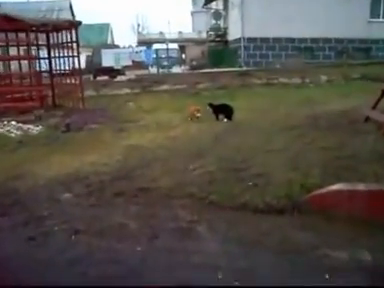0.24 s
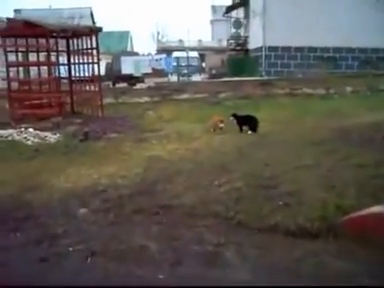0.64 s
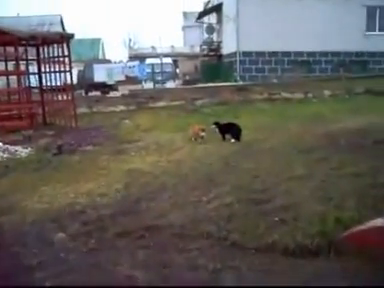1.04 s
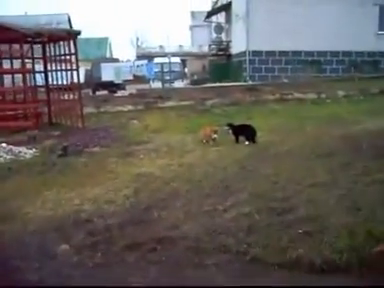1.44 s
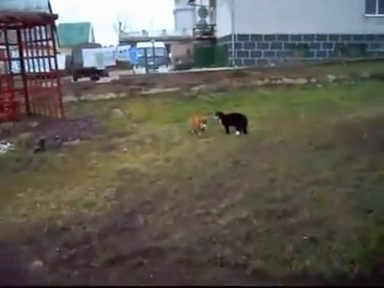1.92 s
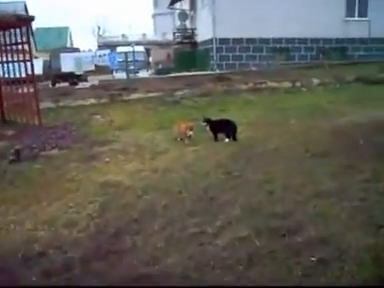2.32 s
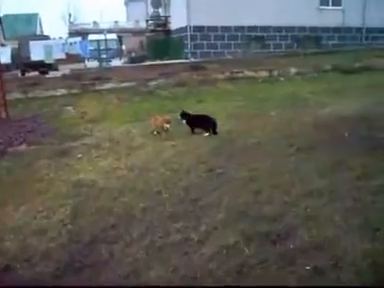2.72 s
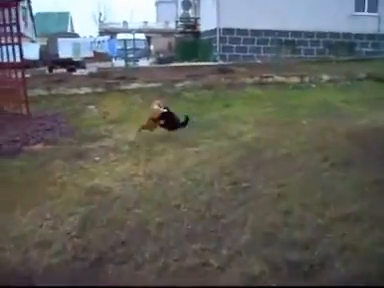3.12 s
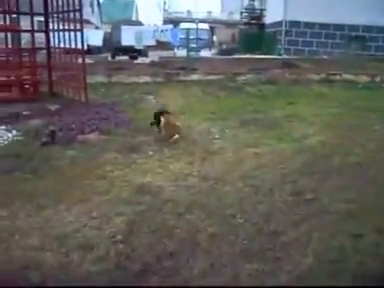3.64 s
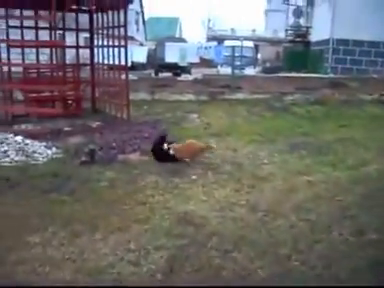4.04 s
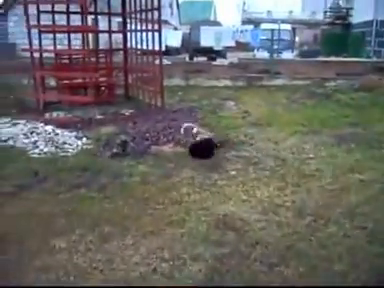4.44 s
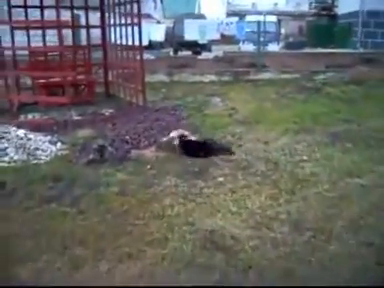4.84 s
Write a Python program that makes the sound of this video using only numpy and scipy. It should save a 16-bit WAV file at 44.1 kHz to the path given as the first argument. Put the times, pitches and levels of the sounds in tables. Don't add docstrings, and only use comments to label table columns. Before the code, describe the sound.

A cat's long nasal yowl strains upward and sinks to a soft moan, then a harsh screech explodes into rasps, growls and muffled whining outdoors.

```python
import sys
import numpy as np
from scipy import signal
from scipy.io import wavfile
from scipy.ndimage import uniform_filter1d

SR = 44100
rng = np.random.default_rng(int(sys.argv[2]) if len(sys.argv) > 2 else 0)


def to_wav(sig):
    pcm = np.clip(np.atleast_2d(sig), -1, 1) * 32767
    pcm = np.round(pcm).astype(np.int16)
    wavfile.write(sys.argv[1], SR, pcm.T)


def to_linear_factor(level_db):
    exponent = np.asarray(level_db, float) / 20
    return 10 ** exponent


N = 224086

# frequency in Hz, density in dB per Hz.
YARD_SPECTRUM = [(30, -9.5), (270, -12.5), (600, -5.5), (1070, -15), (1780, -9.5), (2300, -19), (2830, -20),
                 (7900, -22)]
# peak time in seconds, level in dB, decay to either side in seconds.
RUMBLE_SWELLS = [(0.0, -57.5, 0.48), (2.923, -42.5, .13), (4.075, -53.5, 0.47), (5.08, -55, .15)]
# time in seconds, pitch in Hz, effort in dB, nose opening 0-1.
YOWL_SWELLS = [
    [(0.0, 467, -48.5, 0.27), (0.14, 469, -45.5, 0.57), (0.205, 475, -49, 0.64), (0.222, 475, -35.5, 0.2),
     (0.385, 494.8, -29.5, 0.82), (0.43, 508, -27, 0.52), (0.62, 481, -32, 0.8), (0.69, 487.7, -42, 0.84),
     (0.87, 460.6, -47.5, 0.43)],
    [(0.93, 462.3, -35, 0.93), (1.02, 485.6, -32.5, 0.71), (1.07, 530.5, -29, 1), (1.11, 628, -22, 0),
     (1.16, 690.3, -22, .05), (1.24, 724.5, -19, .05), (1.33, 689.7, -22, .05), (1.41, 603, -20, 0.3),
     (1.47, 542.7, -22.5, 0.56)],
    [(1.53, 497.7, -31, 0.83), (1.61, 511, -29, 0.71), (1.7, 505.3, -29, 0.76), (1.88, 487.7, -28, 0.79),
     (1.95, 492.8, -27, .7), (2.03, 444, -31.5, .65), (2.08, 414.1, -43.5, 0), (2.105, 385, -57, .05)],
]
# centre in Hz, width in Hz, level in dB.
YOWL_CHEST = [(500, 2430, -7.5), (930, 200, 11)]
# centre in Hz, width in Hz, level in dB.
SKULL = [(6800, 900, -9), (8500, 1500, -20)]
# start in seconds, peak in dB, ring in Hz.
TICKS = [(0.1466, -31.5, 5560), (0.2044, -19, 4000), (0.2904, -31, 5300), (0.5396, -23, 5430),
         (1.558, -28, 5510), (3.7978, -29, 3158), (3.881, -39, 3990), (3.9874, -49, 3370),
         (4.0345, -34.5, 6600), (4.116, -33.5, 3207), (4.169, -33.5, 5000), (4.281, -38, 3750),
         (4.361, -38, 4450), (4.4512, -28.5, 4500), (4.464, -33, 3850), (4.4727, -32, 3760),
         (4.485, -30.5, 6260), (4.566, -34, 4270), (4.768, -32, 3380), (4.8348, -35.5, 4470),
         (4.9163, -25, 4590), (4.919, -15, 4700), (4.9251, -11.5, 4730)]
# start in seconds, peak in dB, ring in Hz.
BUMPS = [(1.119, -38, 600), (1.891, -25, 209), (3.987, -28.5, 478), (4.048, -34.5, 213)]
# time in seconds, pitch in Hz, effort in dB, lips parted 0-1.
MOAN = [(2.0, 214.6, -42, .1), (2.046, 244.4, -51.5, 1), (2.132, 321, -48.5, 0.65), (2.218, 419, -41, 0.17),
        (2.346, 476.4, -41.5, .15), (2.436, 401.4, -50, .8), (2.668, 450, -55, 0.98), (2.7, 408, -46, .95)]
# time in seconds, pitch in Hz, effort in dB, gape 0-1.
SCREECH = [(2.485, 204.5, -46.5, 1.03), (2.55, 284.2, -27, .6), (2.602, 321, -22.5, 0.01),
           (2.678, 364.2, -19, 0.17), (2.754, 463.2, -13, 0.23), (2.826, 504, -11.5, 0.62),
           (2.904, 543.7, -12, 0.17), (2.985, 646, -12, .05), (3.0, 628, -8.5, 0.1)]
# time in seconds, added roughness 0-1.
CRACKS = [(2.721, 0), (2.865, .2), (3.002, 0.1)]
# centre in Hz, width in Hz, level in dB.
CHEST = [(447.5, 335, 7), (884, 390, -2.5)]
# start in seconds, top in seconds, top in dB, final mouth and head resonances in Hz.
RASPS = [(2.968, 3.056, -8, 2250, 3584), (3.101, 3.229, -13.5, 1617, 5300), (3.291, 3.337, -26, 1330, 4600)]
# centre in Hz, width in Hz, level in dB.
RASP_CHEST = [(520, 550, -6), (940, 430, 4.5)]
# time in seconds, pitch in Hz, effort in dB.
SQUEAL = [(3.165, 833, -17.5), (3.19, 1066, -13), (3.21, 1335, -15.5), (3.24, 1178, -17.5),
          (3.275, 794, -37)]
# start in seconds, length in seconds, top in dB, mouth at the top in Hz, head in dB.
GROWLS = [(3.39, .235, -31, 2303, -55), (3.611, .165, -37.5, 1310, -75), (4.912, .15, -44, 1950, -48),
          (5.039, 0.098, -30.5, 1910, -44.5)]
# time in seconds, pitch in Hz, effort in dB.
WHINE = [(3.85, 424.5, -56), (3.904, 397, -51), (4.262, 384.7, -40), (4.452, 374.3, -51), (4.472, 398, -52),
         (4.654, 397.6, -55.5), (4.706, 380.5, -43.5), (4.918, 399, -50.5), (4.95, 383, -37)]
# start in seconds, level in dB, chest resonance in Hz, length in seconds.
GRUNTS = [(4.359, -39.5, 500, 0.045), (4.385, -43, 407, 0.047), (4.426, -42.5, 419, 0.031),
          (4.476, -41.5, 478, 0.018), (4.488, -37.5, 428, 0.035), (4.558, -38, 385, 0.043),
          (4.587, -40.5, 480, 0.037), (4.622, -46.5, 370.6, 0.052), (4.862, -37.5, 433, 0.045)]


def evened(x):
    return x / np.sqrt(np.mean(x ** 2) + 1e-20)


def loudness(x, size):
    return np.sqrt(abs(uniform_filter1d(x ** 2, size)) + 1e-20)


def add(mix, s, sound):
    part = mix[round(s * SR):][:len(sound)]
    part += sound[:len(part)]


def unroll(rows):
    s, *columns = np.transpose(rows)
    t = np.arange(s[0], s[-1], 1 / SR)
    return s[0], [np.interp(t, s, c) for c in columns]


def wander(count, size):
    smooth = uniform_filter1d(rng.standard_normal(count), size)
    return evened(uniform_filter1d(smooth, size))


def resonate(x, hz, width):
    turn = np.exp(2j * np.pi * np.cumsum(hz * np.ones(len(x))) / SR)
    r = np.exp(-np.pi * width / SR)
    return 2 * (turn * signal.lfilter([1 - r], [1, -r], x / turn)).real


def yard():
    frames, hz = N // 256 + 5, np.fft.rfftfreq(1024, 1 / SR)
    a, b, patches = rng.standard_normal((frames, 513, 3)).T
    patches = evened(uniform_filter1d(uniform_filter1d(patches, 12, 0), 14, 1))
    f, db = np.transpose(YARD_SPECTRUM)
    colour_db = np.interp(np.log(hz + 1), np.log(f), db)[:, None]
    z = (a + 1j * b) * to_linear_factor(colour_db + 0.5 * patches + 0.61 * wander(frames, size=6))
    return to_linear_factor(-52) * evened(signal.istft(z, nperseg=1024, noverlap=768)[1][:N])


def breeze():
    calm_db = -63
    t = np.arange(N) / SR
    level = to_linear_factor(calm_db) + sum(to_linear_factor(db) * np.exp(-abs(t - s) / decay) for s, db, decay in RUMBLE_SWELLS)
    return level * evened(resonate(rng.standard_normal(N), 51, 130))


def cavity(drive, modes):
    rung = 0
    for k, (hz, width, db) in enumerate(modes):
        rung = rung + (-1) ** k * to_linear_factor(db) * resonate(resonate(drive, hz, width), hz, width)
    return rung / loudness(rung, size=800)


def vocal_folds(hz, rough, odd_db):
    count = len(hz)
    waver = .005 * wander(count, size=350) + .25 * rough ** 2 * wander(count, size=60)
    turns = np.cumsum(hz * (1 + waver)) / SR
    along, steps = np.linspace(0, 1, count), np.linspace(0, 1, count // 200 + 9)
    drift_db = 2.5 * evened(uniform_filter1d(rng.standard_normal((45, len(steps))), size=5, axis=1))
    folds = 0
    for k in range(1, 45):
        level_db = odd_db * (k % 2) + np.interp(along, steps, drift_db[k])
        folds = folds + np.cos(2 * np.pi * k * turns + .1 * k ** 2) * (k * hz < 10000) * to_linear_factor(level_db)
    folds = folds * to_linear_factor(2.7 * rough * wander(count, size=150))
    puffs = (0.57 + np.exp(-(turns % 1) / 0.38)) * rng.standard_normal(count)
    return (1 - rough) * evened(folds) + 0.97 * rough * evened(puffs), turns


def call(s, hz, rough, mouth, head, chest, chest_db, throb_db, lips=(), odd_db=0, nose_db=-99):
    drive, turns = vocal_folds(hz, np.clip(rough, 0, 1), odd_db)
    voice = to_linear_factor(mouth[2]) * cavity(drive, [(*mouth[:2], 0), *lips])
    voice += to_linear_factor(head[2]) * cavity(drive, [(*head[:2], 0)] + SKULL)
    voice += to_linear_factor(chest_db) * cavity(drive, chest)
    voice += to_linear_factor(nose_db) * cavity(drive, [(1470, 99, 0)])
    voice *= to_linear_factor(throb_db * wander(len(hz), size=250))
    return s, voice * np.minimum(1, np.minimum(turns, turns[-1] - turns) / 3)


def yowl():
    s, (hz, effort_db, nose) = unroll(np.concatenate(YOWL_SWELLS))
    strain = np.clip((hz - 537) / 207, 0, 1)
    late = abs(uniform_filter1d(strain, size=3000, origin=1400))
    soft_db = effort_db + 35
    rest_hz, strained_hz = 5300, 3700
    head_hz = rest_hz + (strained_hz - rest_hz) * np.minimum(2.1 * late, 1) + 350 * strain + 15 * soft_db
    head_db = -45.5 + 0.3 * soft_db + 24.5 * late + 0.081 * np.minimum(hz - 470, 0)
    mouth_hz = 2250 - 120 * strain + 12 * np.minimum(soft_db, 0) + 5 * np.minimum(hz - 470, 0)
    rough = .028 - 0.0009 * soft_db + 0.041 * strain - .002 * np.minimum(hz - 460, 0)
    lips = [(3023 + 6 * np.minimum(hz - 465, 0), 460, -8.5), (3580, 270, -21)]
    return call(s, hz, rough, (mouth_hz, 640, effort_db), (head_hz, 1250, head_db), YOWL_CHEST,
                chest_db=-44 + 5.4 * strain, throb_db=-0.68, lips=lips, nose_db=-63.5 + 31.5 * nose)


def walls(x):
    fade = to_linear_factor(-60 * np.arange(9000) / SR / 0.084)
    taps = rng.choice([-1., 1.], 9000) * (rng.random(9000) < .05) * fade
    taps[:400] = 0
    return signal.fftconvolve(x, taps / np.linalg.norm(taps))[:N]


def tick(hz, width, t60):
    t = np.arange(600) / SR
    spit = rng.standard_normal(len(t)) * to_linear_factor(-60 * t / t60)
    spit = resonate(resonate(spit, hz, width), hz, width)
    return spit / abs(spit).max()


def bump(hz, t60, grit):
    t = np.arange(1500) / SR
    ring = (np.sin(2 * np.pi * hz * t) + grit * rng.standard_normal(len(t))) * to_linear_factor(-60 * t / t60)
    return ring / abs(ring).max()


def hum(hz, levels_db, flutter_db):
    turns = np.cumsum(hz) / SR
    tone = sum(to_linear_factor(db) * np.sin(2 * np.pi * (k + 1) * turns) for k, db in enumerate(levels_db))
    flutter = to_linear_factor(flutter_db * wander(len(hz), size=200))
    return np.sqrt(2) * tone * flutter * signal.windows.tukey(len(hz), .05)


def moan():
    s, (hz, effort_db, lips) = unroll(MOAN)
    third_db = effort_db - 40 + 44 * lips
    levels_db = [effort_db - 15 + 6 * lips, effort_db] + [third_db + db for db in [5, -16, -1.5, 0.5]]
    return s, hum(hz, levels_db, flutter_db=2.5)


def screech():
    s, (hz, effort_db, gape) = unroll(SCREECH)
    t = s + np.arange(len(hz)) / SR
    crack_s, halving_s, rise_s = 0.022, 2.6, .06
    rough = .075 + .0016 * np.maximum(hz - 490, 0)
    rough = rough + sum(more * np.exp(-((t - at) / crack_s) ** 2) for at, more in CRACKS)
    odd_db = -24 * np.clip(1 - (t - halving_s) / rise_s, 0, 1) + 0.029 * (hz - 450)
    lean_db = 21 * (gape - .45) / 2
    mouth = (2370 + 0.87 * (hz - 450), 580, effort_db + lean_db)
    head = (4500 + 1.3 * (hz - 450), 1140, effort_db - lean_db)
    chest_db = -45 + 0.59 * np.minimum(effort_db + 23, 0) - 9.9 * (gape - 0.64)
    return call(s, hz, rough, mouth, head, CHEST, chest_db=chest_db, throb_db=-0.94, odd_db=odd_db)


def rasp(start, top, top_db, mouth_hz, head_hz):
    s, (effort_db, done) = unroll([(start, top_db - 6, 0), (top, top_db, .6),
                                   (top + 0.023, top_db - 8.5, .85), (top + .07, top_db - 13.5, 1)])
    first_mouth_hz, first_head_hz = 2203, 4700
    opening_hz = first_mouth_hz + (mouth_hz - first_mouth_hz) * done
    width = np.clip(400 + .9 * (first_mouth_hz - mouth_hz), 200, 900)
    head_db = effort_db - 3.5 + 0.0073 * (opening_hz - first_mouth_hz) + 0.0053 * (mouth_hz - 1900)
    head = (first_head_hz + (head_hz - first_head_hz) * done, 870, head_db)
    pitch = 450 * (1 + .07 * wander(len(done), size=600))
    return call(s, pitch, .6, (opening_hz, width, effort_db), head, RASP_CHEST,
                chest_db=-33, throb_db=0.7, lips=[(3110, 1100, -21.5), (1584, 340, -16.5)])


def squeal():
    s, (hz, effort_db) = unroll(SQUEAL)
    done = np.linspace(0, 1, len(hz))
    mouth, head = (1950 - 830 * done, 1200, effort_db), (5100, 1100, effort_db - 20)
    return call(s, hz, .4 + .2 * done, mouth, head, CHEST, chest_db=-63, throb_db=-3.0)


def growl(start, length, top_db, mouth_hz, head_db):
    end, end_db = start + length, top_db - 12.5
    s, (arch, effort_db, fade_db) = unroll([(start, 0, top_db - 4.5, -1.5),
                                            (start + 0.65 * length, 1, top_db, 0),
                                            (start + .8 * length, .45, top_db - 6.5, -.5),
                                            (end, 0, end_db, -8), (end + .06, 0, end_db - 1, -15)])
    shut_hz = 976
    wide_hz = mouth_hz - shut_hz
    rough = .22 + .12 * arch + .00022 * wide_hz
    late = uniform_filter1d(arch, size=2001, origin=900)
    pitch = 199.3 + 50.66 * late
    opening_hz = shut_hz + wide_hz * arch ** (0.23 + 0.0014 * abs(wide_hz))
    mouth = (opening_hz, 190 + 0.31 * wide_hz, effort_db)
    head = (4900 - 400 * arch, 640, head_db + fade_db)
    chest_db = -33 + 0.0056 * (wide_hz - 897) + fade_db
    return call(s, pitch, rough, mouth, head, CHEST, chest_db=chest_db, throb_db=1.8,
                lips=[(2320, 1060, -20.0)])


def scuffle():
    start_s, length_s = 3.5, 1.34
    grains = rng.standard_normal(round(length_s * SR))
    grains = grains * to_linear_factor(2.4 * wander(len(grains), size=100))
    high = resonate(resonate(grains, 2270, 630), 2150, 610)
    low = resonate(resonate(grains, 926, 194), 765, 220)
    return start_s, to_linear_factor(-50) * evened(high + 4.4 * low) * signal.windows.tukey(len(grains), .08)


def whine():
    s, (hz, effort_db) = unroll(WHINE)
    t = s + np.arange(len(hz)) / SR
    tremble_hz, pinned_s = 47, 4.35
    depth = 0.63 * np.clip((t - pinned_s) / 0.26, .2, 1)
    tremble = 1 + depth * np.cos(2 * np.pi * tremble_hz * t)
    return s, tremble * hum(hz, [-70, effort_db, -63, -66, -71, -65], flutter_db=1.3)


def grunt(s, db, hz, length):
    t = np.arange(0, length, 1 / SR)
    drive = np.exp(-(t * hz / 2 % 1) / 0.062) + 0.69 * rng.standard_normal(len(t))
    chest = evened(resonate(resonate(drive, hz, 276), hz, 285))
    return s, to_linear_factor(db) * chest * np.sin(np.pi * t / length)


def scene():
    cats, hands = np.zeros(N), breeze()
    for source in (yowl, moan, screech, squeal, scuffle, whine):
        add(cats, *source())
    for source, rows in ((rasp, RASPS), (growl, GROWLS), (grunt, GRUNTS)):
        for row in rows:
            add(cats, *source(*row))
    for s, db, hz in TICKS:
        add(hands, s, to_linear_factor(db) * tick(hz, width=3000, t60=0.0084))
    for s, db, hz in BUMPS:
        add(hands, s, to_linear_factor(db) * bump(hz, t60=0.034, grit=0.45))
    return (cats + to_linear_factor(-13.0) * walls(cats) + hands + yard())[None]


def top_cut(x):
    return signal.sosfilt(signal.butter(12, 14470, fs=SR, output="sos"), x)


def record(dry):
    slow_sr = 16000
    t, slow_t = np.arange(N) / SR, np.arange(0, N / SR + .01, 1 / slow_sr)
    slow = np.interp(slow_t, t, dry[0])
    slow = slow + to_linear_factor(-17.0) * loudness(slow, size=40) * rng.standard_normal(len(slow))
    spikes = np.zeros(len(slow) * 3)
    spikes[::3] = 3 * slow
    spikes += to_linear_factor(-66) * np.cos(np.pi * np.arange(len(spikes)) / 3)
    edge_hz = [0, 6986, 7990.5, 9000.5, 9991.5, 11006, 24000]
    edge_db = [0, -5, -5, -24, -51.5, -75, -67]
    smooth = signal.firwin2(255, edge_hz, to_linear_factor(edge_db), fs=3 * slow_sr)
    full = signal.resample_poly(signal.oaconvolve(spikes, smooth, "same"), 147, 160)[:N]
    over = np.maximum(abs(full) - .42, 0)
    bent = full - np.sign(full) * (over - .28 * np.tanh(over / .28))
    return top_cut(bent[None])


dry = scene()
out = record(dry)
to_wav(out)
```